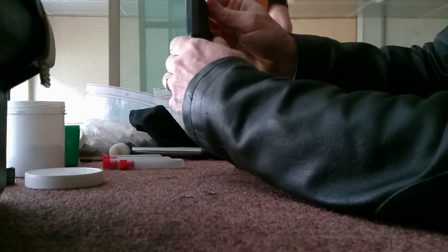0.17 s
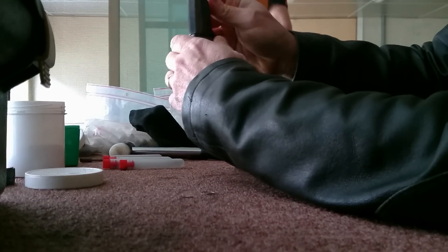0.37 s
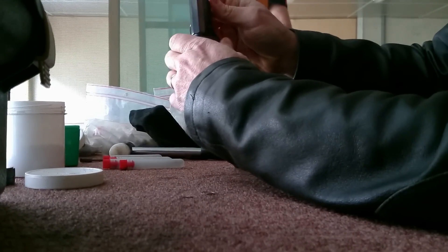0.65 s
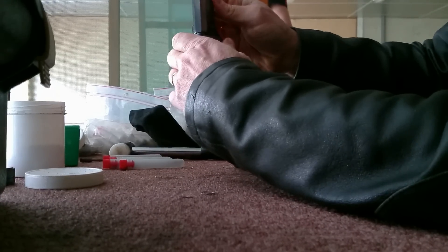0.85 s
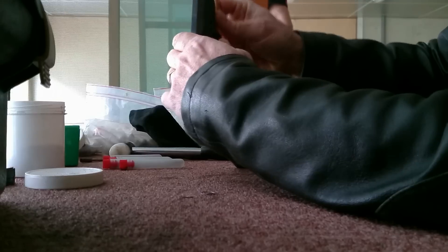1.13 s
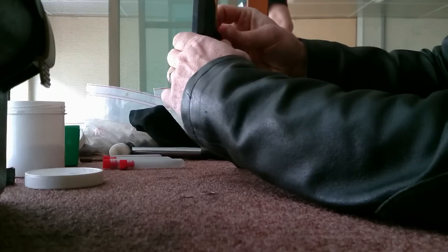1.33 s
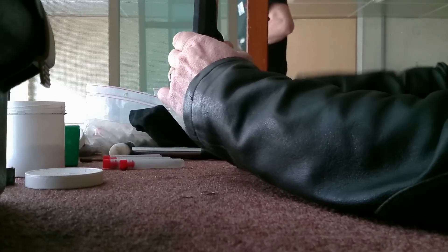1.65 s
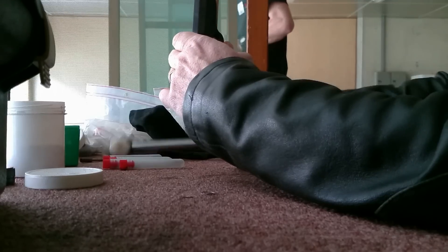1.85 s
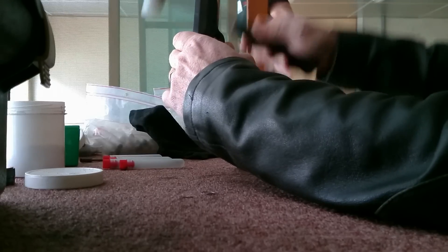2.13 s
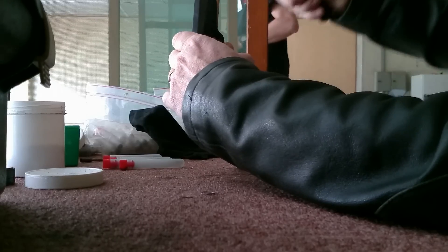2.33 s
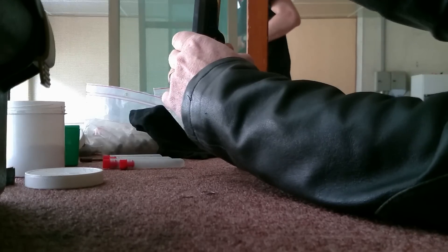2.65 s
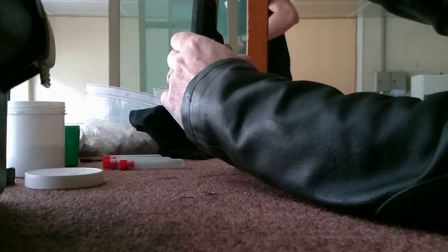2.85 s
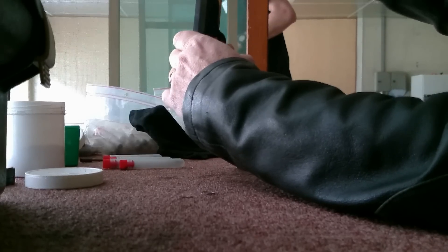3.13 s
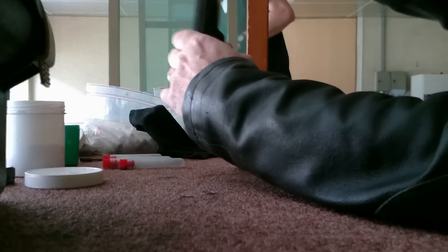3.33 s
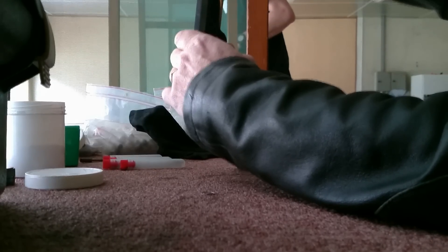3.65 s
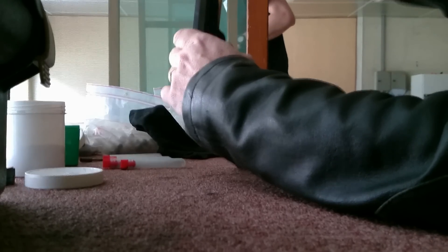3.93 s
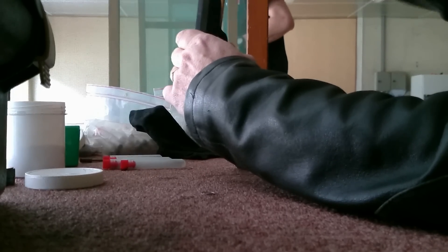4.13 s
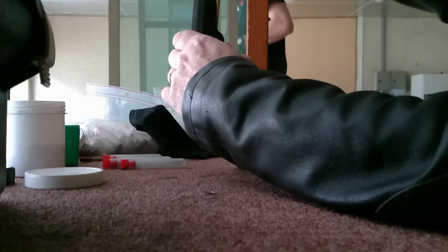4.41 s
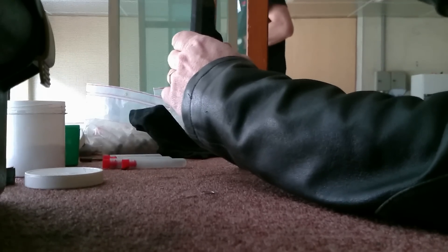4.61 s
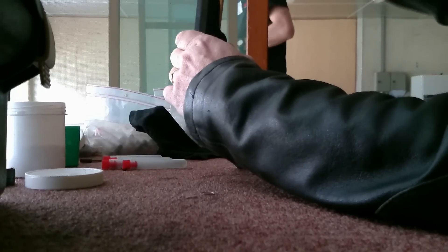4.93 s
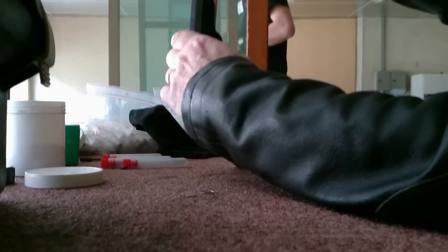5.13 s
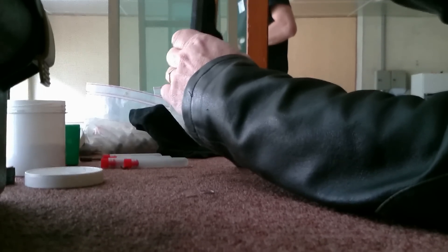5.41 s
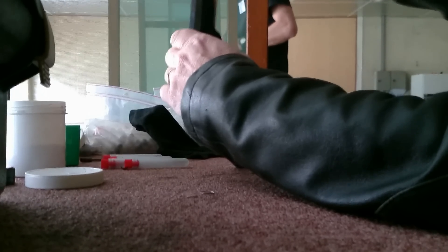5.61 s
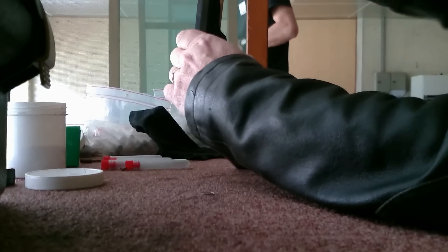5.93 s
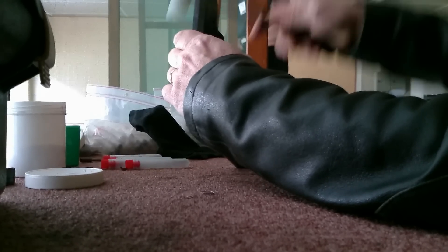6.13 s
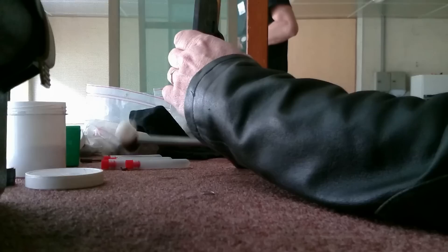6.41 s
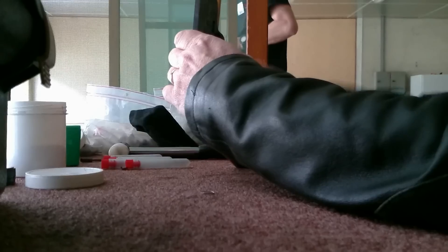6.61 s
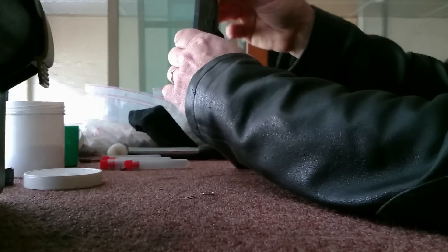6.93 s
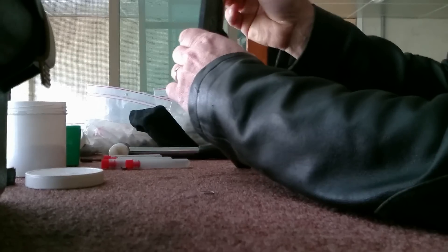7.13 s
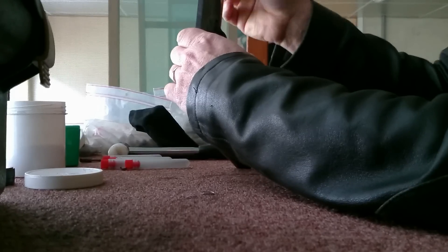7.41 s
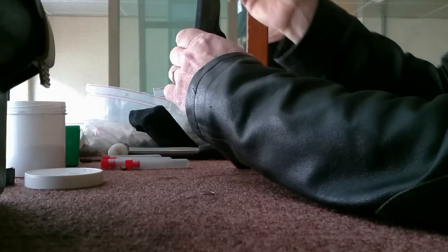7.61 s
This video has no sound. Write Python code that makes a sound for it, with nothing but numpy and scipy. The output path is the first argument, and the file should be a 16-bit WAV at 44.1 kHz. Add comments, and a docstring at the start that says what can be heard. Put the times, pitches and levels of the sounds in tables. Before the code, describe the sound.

Quiet room noise with soft knocks and a bright cluster of metallic clicks as a revolver is handled. Then come about four blows a second, growing quickly from moderate to violent, steel cracking and the table booming beneath, overloaded, with small rattles and short room echo. They stop abruptly; a rod is put down with a low bouncing thud, and only slight sleeve rustles and tiny ticks remain.

```python
"""A steel rod is rammed down thirteen times on an old revolver on a cloth-covered table in a bare room.
Noise bursts make the steel crack, and pushed modes make the table boom and overload a small stereo recorder.
Before and between the blows, resonant noise bursts click like small metal parts under the fingers.
The rod scrapes and is laid down with a bouncing thump of one low mode. Grainy noise rustles as a leather
sleeve, over steady room noise."""
import sys
import numpy as np
from scipy import signal
from scipy.io import wavfile

SR = 44100
rng = np.random.default_rng(int(sys.argv[2]) if len(sys.argv) > 2 else 0)


def master_out(mix):
    """Clip the mix to full scale and print it as 16-bit PCM to the path in sys.argv[1]."""
    frames = np.transpose(np.atleast_2d(mix))
    ceiling = np.clip(frames, -1, 1)
    pcm = np.round(ceiling * 32767).astype(np.int16)
    wavfile.write(sys.argv[1], SR, pcm)


N = 342216

# Rod blows: t/s, boom level/dB, crack level/dB, contact/ms, clack f/Hz, clack level/dB
ROD_BLOWS = [(2.7094, -16, -8, 3, 2670, -28.5), (2.9441, -9, -6.5, 4.9, 2210, -21),
             (3.194, -6, -4.5, 4.9, 2230, -19), (3.491, -2.5, 1, 3.9, 2530, -14),
             (3.778, 0.5, 5, 1.6, 2770, -22), (4.0577, 1.5, 4.5, 2.76, 1790, -22),
             (4.353, 1, 7, 0.32, 2680, -11), (4.645, -0.7, -3.5, 5.8, 3250, -16),
             (4.933, -2.14, -2, 4.7, 3330, -15.5), (5.1961, 1.5, -1.5, 3.9, 1940, -21),
             (5.445, 0, 3, 2.46, 2520, -13), (5.7437, 0, 3, 2.75, 2830, -17.5),
             (6.0113, 1.5, 9, 0.68, 1760, -8)]
# Loose things that jump and land after a blow: delay/ms, level/dB
RATTLES = [(8.7, -23), (18.2, -30)]
# Table top modes: f/Hz, level/dB, t60/s, left minus right/dB, gain per dB of force/dB
TABLE_MODES = [(97.7, 2.5, 0.18, -2, 0.07), (116.2, -13, 0.27, 4.5, -0.26), (141.8, -0.66, 0.16, 5.5, 0.27),
               (172.8, -15, 0.32, 2.5, 0.47), (186.6, -21, 0.44, 4, -0.34), (229.5, -14.5, 0.22, 4, -0.48),
               (256.5, -30, 0.35, 3.5, -.9), (295, -12.5, 0.17, 1, -0.4), (340.3, -4, 0.12, 3.5, 0.48),
               (385, -15, 0.22, -2, -0.6), (443, -15, 0.036, 11, 2), (520, -11, 0.028, 5, 1.15),
               (646.6, -15, 0.14, 8, -0.34), (792, -16.5, 0.17, 1.5, 0.3), (707, -8.5, 0.041, 0.5, -1),
               (875, -0.5, 0.024, 2, 0.5)]
# Soft knocks on the table: t/s, boom level/dB, thud level/dB, share reaching the lowest modes/dB
SOFT_KNOCKS = [(0.367, -54.5, -60.5, 13), (0.495, -45, -77, -5), (0.582, -33, -83, -15),
               (0.62, -31.5, -58.5, -12.5), (1.231, -56, -52, -4), (1.51, -39, -62, -5),
               (1.834, -38, -59, -1), (6.671, -11, -47.5, -2.5), (6.696, -29, -64, 14),
               (6.723, -17.5, -58, -3), (6.768, -28, -63, -5), (6.973, -33, -66, -15),
               (7.175, -42, -57, 1.5), (7.424, -23, -61.5, -36)]
# Dense upper modes of the table, decay: f/Hz, t60/s
THUD_DECAY = [(100, 0.59), (400, 0.15), (1100, 0.077), (3000, 0.024)]
# Dense upper modes of the table, colour: f/Hz, level/dB
THUD_SPECTRUM = [(60, -33), (150, -10), (400, -2.5), (750, -5), (1300, -18.5), (2500, -14.5), (6000, -53.5)]
# Close modes of the steel rod: f/Hz, level/dB, t60/s
ROD_MODES = [(3190, -4, .45), (3268, 0, .5), (3320, -2, .45), (3375, -2, .35)]
# Blows that leave the rod ringing: t/s, level/dB
RINGING_BLOWS = [(4.355, -45), (4.647, -37), (4.934, -35), (5.198, -37)]
# The rod lands and bounces on the cloth: t/s, level/dB
ROD_LANDINGS = [(6.674, -7.5), (6.725, -15), (6.768, -22)]
# Resonances of the sliding rod and table: f/Hz, width/Hz, level/dB
SCRAPE_RESONANCES = [(403, 200, 1.5), (880, 370, -7.5), (2800, 990, -12), (5787, 500, -17),
                     (8300, 1600, -16)]
# Metal clicks: t/s, peak level/dB, left minus right/dB, f/Hz, t60/ms, room send/dB, duller body/dB
METAL_CLICKS = [(0.408, -30.5, -8, 8750, 25, -16, -17.5), (0.4208, -36, 2, 5760, 34, -19, -14),
                (0.4317, -47, 20, 7300, 14, -14.5, -8), (1.164, -42, -3, 7500, 6, -11.5, -30),
                (1.1733, -17.5, -1, 5640, 23, -12, -26.5), (1.2208, -10, -7, 5770, 11, -13.5, -27),
                (1.2242, -12, 5, 6130, 11, -5, -22), (1.2305, -19.5, -10.5, 5850, 12, -3, -23.5),
                (1.2405, -11, 4, 8720, 71, -2, -16.5), (1.2393, -4, -19.5, 5586, 17, -5.5, -13),
                (1.3745, -14.5, -1.5, 5270, 9.4, -9, -37.5), (1.51, -41.5, 9, 7390, 20.5, -22, -8),
                (1.611, -30.5, 0, 6400, 12, -6, -14.5), (1.807, -21.5, 2.5, 6040, 44, 10, -11),
                (1.809, -25, -15, 1234, 78, 13.5, -1), (2.025, -39, 10, 4970, 12.5, 6, -9),
                (2.0815, -41.5, -4, 10000, 13.4, -5, -16), (2.83, -31.5, 10.5, 7700, 5.2, -18, -15),
                (3.266, -26, 17, 7900, 13, -25, -31), (3.526, -16.5, 15, 7800, 10, 2, -15),
                (4.713, -24, 10, 13800, 26, -20.5, -3), (4.7263, -30, 41.5, 8500, 13, -14, -14.5),
                (5.4875, -19, 27, 7800, 8.4, 6, -13.5), (5.662, -34, -4.5, 7550, 56, 6.5, -16),
                (5.768, -10, 9, 9100, 6, -13.5, -14.5), (6.6726, -35.5, 9.5, 1830, 16, 1, -14.5),
                (6.482, -54, 1, 4520, 12.8, -12.5, -20.5), (6.89, -54, 2, 903, 12.4, -9, -14),
                (7.188, -37.5, 22, 5080, 31, -2, -21.5), (7.197, -38.5, 6.5, 5700, 12, -10, -14),
                (7.549, -54, 5, 8640, 10, -10, -20), (7.5214, -54, 8, 2800, 12.6, -9, -17),
                (7.5834, -54, 6, 8340, 12.5, -7, -13), (7.6275, -54.5, -5, 2880, 14.8, -9, -16),
                (7.6933, -52, -13, 2910, 15, -2, -10)]
# Steel frame modes: f/Hz, level/dB, t60/s
FRAME_MODES = [(2440, -29, 0.08), (2880, -28, .12), (4860, -26, 0.17), (5700, -28, 0.1), (6050, -25, 0.22),
               (8150, -25, .09)]
# Movements of sleeve and fingers: peak t/s, rustle level/dB, dull rub level/dB, dying time/s
MOVEMENTS = [(.07, -57, -65.5, 0.16), (0.436, -57, -59, 0.063), (1.03, -64, -85, 0.04),
             (1.157, -75, -49.5, 0.023), (1.224, -31.5, -79, 0.054), (2.087, -53.5, -79.5, 0.015),
             (6.399, -62, -67.5, 0.071), (6.649, -64, -52, 0.049), (7.03, -75, -74, 0.034),
             (7.188, -54, -58, 0.025), (7.44, -79, -70.5, 0.042), (7.539, -70, -68.5, 0.026),
             (7.69, -64.5, -87, 0.06)]
# Decay of the room: f/Hz, t60/s
ROOM_DECAY = [(300, 0.94), (1100, 0.33), (2900, 0.42), (7700, 0.38), (14000, 0.31)]
# Colour of the room's echoes: f/Hz, level/dB
ROOM_SPECTRUM = [(300, 2), (900, 1.5), (1600, -1), (2900, 1.5), (7700, -2.5), (11500, -7.5), (14000, -23),
                 (16500, -20.5)]
# Relative noise density of the quiet room: f/Hz, level/dB
NOISE_SPECTRUM = [(15, -33), (25, -2.5), (62, -5), (214, -23), (927, -32.5), (1060, -33), (1180, -38.5),
                  (3810, -36.5), (11300, -45.5), (14800, -50), (16500, -62)]
# Microphone port resonances, left list then right list: f/Hz, width/Hz, level/dB
PORT_RESONANCES = [
    [(8100, 2400, 8.5), (5700, 2900, -10), (13200, 1800, -6)],
    [(5385, 990, 10.5), (2900, 570, 3), (7550, 4500, -16.5)],
]

# Crack: the steel contact builds, holds, then dies; the grind is hollow between clack and treble
GRIP_MS, LET_GO_MS = 1, 1
HOLLOW_HZ, HOLLOW_WIDTH_HZ, HOLLOW_SHARE = 3960, 2500, 0.47
CRACK_LAG = 20  # samples by which the right port hears it later
# Clack: rough, its pitch blurred; it dies after the contact
CLACK_WIDTH_HZ, CLACK_T60_MS = 650, 12
# Shiver: six more bright ticks per blow, at random from 20 ms on within this span, fading
SHIVER_S, SHIVER_DB, SHIVER_LOSS_DB_PER_S = 0.099, -13.5, 106.5
# What a blow of 0 dB boom sends to the room; dB gained per dB of boom
ECHO_DB, ECHO_FOLLOWS = -8, 1

# Push on the table at 0 dB boom: harder is shorter, and it follows the contact
BLOW_PUSH_MS, PUSH_MS_PER_DB, BOOM_DELAY_S = 2.146, 0.15, 0.0011
# A sharp, shorter tap starts together with every push and reaches the upper modes; it gains with force
TAP_MS, TAP_DB, TAP_FOLLOWS = 0.76, -4.5, 0.96
# A soft knock pushes longer and shares the blend of modes of a blow this soft
KNOCK_PUSH_MS, KNOCK_BLEND_DB = 4.3, -7.5
TABLE_LATE_MS = 0.3  # the right port hears the modes later
# Thud of a blow of 0 dB boom; dB gained per dB of boom; samples the right port hears it later
THUD_DB, THUD_FOLLOWS, THUD_LAG = -14, 1.85, 9

DROP_HZ, DROP_T60_S = 140, 0.078  # a short dead thump
SCRAPE_S, SCRAPE_DB = (6.595, 6.672), -51  # the rod slides on the table before it drops

# Clicks: little below a share of the pitch; widths of two resonances in a row as shares of it
CLICK_FLOOR_SHARE, CLICK_WIDTH_1, CLICK_WIDTH_2 = 0.72, 0.22, 0.7
FAR_DB_PER_OCTAVE = 18  # a click stirs frame modes far from its own pitch less
# A finger drags along the frame, ever lighter, and damps its modes to this width
RUB_S, RUB_DB, RUB_WIDTH_HZ = (7.166, 7.25), -63, 140

RISE_SHARE = 0.45  # a rustle swells in this share of its dying time
REST_DB, REST_RUB_DB = -79, -70.5  # faint rustle and rub between movements
LEATHER_HZ, LEATHER_WIDTH_HZ, LEATHER_DB = 5710, 750, -11.5  # narrow hissing band
ROOM_NOISE_DB = -56  # rms over both channels
# Zero-line wander: at rest; after a 0 dB boom; dB per dB of boom; dying time
WANDER_REST_DB, WANDER_DB, WANDER_FOLLOWS, WANDER_S = -41.5, -28, 0.38, 0.36
CUTOFF_HZ = 17100


def rod_blows():
    """Grinding steel contact with rattles and ticks, its pitched clack, and the impulses sent to the room."""
    crack, clacks, sent = np.zeros(N), np.zeros(N), np.zeros(N)
    t = np.arange(1400) / SR
    build = np.minimum(1000 * t / GRIP_MS, 1)
    for s, boom_db, crack_db, ms, clack_hz, clack_db in ROD_BLOWS:
        past_contact_ms = np.maximum(1000 * t - ms, 0)
        for late_ms, db in [(0, 0.008)] + RATTLES:
            noise = butter(rng.standard_normal(len(t)), [1300, 13500], "band")
            grind = noise * build * np.exp(-past_contact_ms / LET_GO_MS)
            hollow = grind - HOLLOW_SHARE * resonance(grind, HOLLOW_HZ, HOLLOW_WIDTH_HZ)
            add(crack, s + late_ms / 1000, hollow * from_db(crack_db + db))

        # The resonance runs in for 600 samples before it is heard.
        rough = resonance(rng.standard_normal(len(t) + 600), clack_hz, CLACK_WIDTH_HZ)[600:]
        pitched = rms_one(resonance(rough, clack_hz, 2 * CLACK_WIDTH_HZ))
        clack = pitched * build * from_db(-60 * past_contact_ms / CLACK_T60_MS)
        add(clacks, s, clack * from_db(clack_db))

        for late_s, chance in rng.random((6, 2)) * [SHIVER_S, 1] + [0.02, 0]:
            tick = butter(rng.standard_normal(len(t)), [3500, 11000], "band") * np.exp(-t / 0.0016)
            tick_db = crack_db + SHIVER_DB - SHIVER_LOSS_DB_PER_S * late_s - 8 * chance
            add(crack, s + late_s, tick * from_db(tick_db))
        add(sent, s, from_db([ECHO_DB + ECHO_FOLLOWS * boom_db]))
    return crack, clacks, sent


def table_pushes():
    """Blows and knocks as t/s, level/dB, thud/dB, push/ms, lowest modes/dB, blend/dB; harder blows push shorter."""
    pushes = []
    for s, db, *_ in ROD_BLOWS:
        push_ms = BLOW_PUSH_MS - PUSH_MS_PER_DB * db
        pushes.append((s + BOOM_DELAY_S, db, THUD_DB + THUD_FOLLOWS * db, push_ms, 0, db))
    for s, db, thud_db, bass_db in SOFT_KNOCKS:
        pushes.append((s + BOOM_DELAY_S, db, thud_db, KNOCK_PUSH_MS, bass_db, KNOCK_BLEND_DB))
    return pushes


def table(pushes, spread_db=2.5):
    """Half-sine pushes ring the table's separate modes; its dense upper modes blur into a thud."""
    boom, struck = np.zeros((2, N)), np.zeros(N)
    luck = rng.standard_normal((len(pushes), len(TABLE_MODES)))
    for k, (hz, level_db, t60, pan_db, follows) in enumerate(TABLE_MODES):
        force, lowest = np.zeros(N), k < 3
        for (s, db, _, ms, bass_db, blend_db), chance in zip(pushes, luck[:, k]):
            gain = from_db(db + level_db + follows * blend_db + lowest * bass_db + spread_db * chance)
            add(force, s, half_sine(ms) * gain)
            if not lowest:
                add(force, s, half_sine(TAP_MS) * gain * from_db(TAP_DB + TAP_FOLLOWS * db))
        sign = 1 if lowest else (-1) ** k  # lowest three in step, the others in turns
        late = round(TABLE_LATE_MS * SR / 1000)
        boom += spread(sign * ring(force, hz, t60), pan_db / 2, -pan_db / 2, late)
    for s, _, thud_db, *_ in pushes:
        add(struck, s, from_db([thud_db]))
    thud = dying(struck, THUD_SPECTRUM, THUD_DECAY, alike=0.87, swell_s=0.00047, patchy_db=2.5)
    return boom + spread(thud, 45.1, 41.65, THUD_LAG)


def rod_ring():
    """The rod rings in a cluster of close modes that beat against each other."""
    struck = np.zeros(N)
    for s, ring_db in RINGING_BLOWS:
        add(struck, s, from_db([ring_db]))
    return sum(smeared(from_db(db) * ring(struck, hz, t60), 60) for hz, db, t60 in ROD_MODES)


def drop():
    """The cloth deadens the table under the falling rod: one low mode, soon gone."""
    force = np.zeros(N)
    for s, db in ROD_LANDINGS:
        add(force, s, half_sine(KNOCK_PUSH_MS) * from_db(db))
    return ring(force, DROP_HZ, DROP_T60_S)


def scrape():
    """Sliding roughness excites resonances of rod and table, growing until the drop."""
    t, (start, stop) = np.arange(N) / SR, SCRAPE_S
    uneven = rms_one(butter(rng.standard_normal(N), 150, "low"))
    rough = rng.standard_normal(N) * from_db(2.5 * uneven)
    colour = sum(from_db(db) * rms_one(twice_resonant(rough, hz, width, width))
                 for hz, width, db in SCRAPE_RESONANCES)
    swell = np.interp(t, [start, start + 0.018, stop, stop + 0.017], [0.022, 0.55, 1.0, 0])
    return from_db(SCRAPE_DB) * colour * swell


def click_colour(x, hz, body_db):
    """Two broad resonances give a click its pitch, over a duller body."""
    bright = butter(x, CLICK_FLOOR_SHARE * hz, "high")
    pitched = twice_resonant(bright, hz, CLICK_WIDTH_1 * hz, CLICK_WIDTH_2 * hz)
    return pitched + from_db(body_db) * butter(x, [650, 2400], "band")


def clicks():
    """Dying noise excites each metal part's resonance; an impulse of the same colour goes to the room."""
    dry, sent, t = np.zeros((2, N)), np.zeros(N), np.arange(2600) / SR
    for s, db, pan_db, hz, ms, room_db, body_db in METAL_CLICKS:
        noise = rng.standard_normal(len(t)) * from_db(-60000 * t / ms)
        tick = click_colour(noise, hz, body_db)
        blip = click_colour(1.0 * (t == 0), hz, body_db)
        sides = from_db(db + 0.5 * pan_db * np.array([[1], [-1]]))
        add(dry, s, tick / np.abs(tick).max() * sides)
        add(sent, s, blip * from_db(db + room_db))
    return dry, sent


def frame():
    """Clicks and a drag stir the steel frame's modes; clicks between first and last blow leave it silent."""
    out = np.zeros(N)
    luck = rng.standard_normal((len(METAL_CLICKS), len(FRAME_MODES)))
    dragging = np.interp(np.arange(N) / SR, RUB_S, [1, 0], left=0)
    for k, (hz, level_db, t60) in enumerate(FRAME_MODES):
        struck, drag = np.zeros(N), dragging * rng.standard_normal(N)
        for (s, db, _, pitch_hz, *_), chance in zip(METAL_CLICKS, luck[:, k]):
            amid_blows = ROD_BLOWS[0][0] < s < ROD_BLOWS[-1][0]
            if not amid_blows:
                far_db = FAR_DB_PER_OCTAVE * abs(np.log2(hz / pitch_hz))
                add(struck, s, from_db([db + level_db - far_db + 3 * chance]))
        out += smeared(ring(struck, hz, t60), 130)
        rub = twice_resonant(drag, hz, RUB_WIDTH_HZ, RUB_WIDTH_HZ)
        out += from_db(RUB_DB) * np.sqrt(SR / RUB_WIDTH_HZ) * rub  # narrow bands keep their loudness
    return out


def rustle(rough_db=3.05):
    """Dense uneven grains of leather and cloth over a duller rub; each movement swells and dies."""
    t = np.arange(N) / SR
    high_gain, low_gain = from_db(REST_DB), from_db(REST_RUB_DB)
    for s, high_db, low_db, dying_s in MOVEMENTS:
        shape = np.exp(-np.abs(t - s) / dying_s / np.where(t < s, RISE_SHARE, 1))
        high_gain = high_gain + from_db(high_db) * shape
        low_gain = low_gain + from_db(low_db) * shape
    uneven = rms_one(butter(rng.standard_normal(N), 120, "low"))
    grains = rng.standard_normal((2, N)) * from_db(rough_db * uneven)
    high = rms_one(butter(grains, [2200, 11000], "band"))
    low = rms_one(butter(grains, [200, 1300], "band"))
    hiss = rms_one(twice_resonant(high, LEATHER_HZ, LEATHER_WIDTH_HZ, LEATHER_WIDTH_HZ))
    return high_gain * (high + from_db(LEATHER_DB) * hiss) + low_gain * low


def room_noise():
    """Steady broad noise; the bass is largely alike in both channels."""
    out = 0
    for hz, pair in bands(N):
        out = out + from_db(at_hz(NOISE_SPECTRUM, hz)) * partly_alike(pair, np.clip(400.0 / hz, 0, 0.9))
    return from_db(ROOM_NOISE_DB) * rms_one(out)


def wander():
    """Infrasonic wavering near 7 Hz, far stronger in the right channel; each blow stirs it up."""
    noise, stirred = rng.standard_normal(N + SR), np.zeros(N)
    for s, boom_db, *_ in ROD_BLOWS:
        add(stirred, s, from_db([WANDER_DB + WANDER_FOLLOWS * boom_db]))
    excited = signal.lfilter([1], [1, -np.exp(-1 / (WANDER_S * SR))], stirred)
    rocking = resonance(resonance(noise, 7.2, 1.8), 12.0, 19.0)[SR:]
    return rms_one(rocking) * (from_db(WANDER_REST_DB) + excited) * from_db([[-25.5], [0]])


def dying(impulses, colour, t60s, alike, swell_s, patchy_db):
    """Countless modes or echoes: the energy put into each band swells, dies away and sounds as noise."""
    out, rise = 0, np.exp(-1 / (swell_s * SR))
    for hz, pair in bands(N):
        fall = from_db(-120 / (at_hz(t60s, hz) * SR))  # energy falls twice as fast as amplitude
        power = butter(impulses + 1e-9, hz * 2 ** np.array([-0.25, 0.25]), "band") ** 2
        energy = signal.lfilter([1 - rise], np.convolve([1, -fall], [1, -rise]), power)
        patches = rms_one(butter(rng.standard_normal(N), 11.0, "low"))  # each band dips on its own
        gain = from_db(at_hz(colour, hz) + patchy_db * patches)
        out = out + gain * np.sqrt(energy) * partly_alike(pair, alike)
    return out


def smeared(x, hz):
    """Slow noise makes a ring swell and waver at random."""
    return x * (0.45 + 0.9 * rms_one(butter(rng.standard_normal(N), hz, "low")))


def half_sine(ms):
    """A push of unit area."""
    push = np.sin(np.linspace(0, np.pi, round(ms * SR / 1000)))
    return push / push.sum()


def ring(impulses, hz, t60):
    """A unit impulse sets a sine of height 1 ringing."""
    r, w = from_db(-60 / (t60 * SR)), 2 * np.pi * hz / SR
    return signal.lfilter([0, np.sin(w)], [1, -2 * r * np.cos(w), r * r], impulses + 1e-18)


def resonance(x, hz, width_hz):
    """Band-pass with gain 1 on top."""
    r = np.exp(-np.pi * width_hz / SR)
    b = np.array([1, 0, -1]) * (1 - r * r) / 2
    return signal.lfilter(b, [1, -2 * r * np.cos(2 * np.pi * hz / SR), r * r], x)


def twice_resonant(x, hz, width_1_hz, width_2_hz):
    """Two resonances in a row at one pitch."""
    return resonance(resonance(x, hz, width_1_hz), hz, width_2_hz)


def butter(x, hz, kind):
    """Butterworth filter of design order two."""
    return signal.sosfilt(signal.butter(2, hz, kind, fs=SR, output="sos"), x)


def bands(size):
    """Half-octave bands of noise, own in each channel, with their centres."""
    edges, white = 25 * 2 ** np.arange(0, 9.6, 0.5), rng.standard_normal((2, 2, size))
    # Neighbouring bands take turns with two noises.
    return [(np.sqrt(a * b), butter(white[k % 2], [a, b], "band"))
            for k, (a, b) in enumerate(zip(edges, edges[1:]))]


def partly_alike(pair, alike):
    """Mix a share of the left noise into the right at equal power."""
    left, right = pair
    return np.array([left, alike * left + np.sqrt(1 - alike ** 2) * right])


def spread(x, left_db, right_db, lag):
    """Levels for the two ports, the right one late by lag samples."""
    x = x * from_db([[left_db], [right_db]])
    x[1] = np.concatenate([np.zeros(lag), x[1, :-lag]])
    return x


def add(track, s, sound):
    """Mix a short sound in at time s."""
    i = round(s * SR)
    track[..., i:i + sound.shape[-1]] += sound[..., :N - i]


def from_db(db):
    """Decibels to gain."""
    return 10 ** (np.asarray(db, float) / 20)


def rms_one(x):
    """Scale to unit rms."""
    return x / np.sqrt(np.mean(x ** 2) + 1e-20)


def at_hz(points, hz):
    """Read a spectrum on a log frequency axis."""
    f, values = np.array(points).T
    return np.interp(np.log(hz), np.log(f), values)


def scene():
    """Everything at the two microphone ports."""
    crack, clack, crack_sent = rod_blows()
    boom = table(table_pushes())
    ticks, ticks_sent = clicks()
    blows = spread(crack, -1.8, -9.0, CRACK_LAG) + clack + boom + rod_ring()
    room = dying(crack_sent + ticks_sent, ROOM_SPECTRUM, ROOM_DECAY, alike=0.46, swell_s=0.0006, patchy_db=1.8)
    return blows + drop() + scrape() + ticks + frame() + rustle() + room + room_noise()


def record(dry):
    """Ports resonate, bass rolls off, loud booms saturate, the zero line wanders and the top is cut."""
    x = np.array([c + sum((from_db(db) - 1) * resonance(c, hz, width_hz) for hz, width_hz, db in port)
                  for c, port in zip(dry, PORT_RESONANCES)])
    x = butter(x, 100.0, "high")
    top = 0.78  # ceiling of the overload
    x = x / (1 + np.abs(x / top) ** 4) ** 0.25
    x = signal.lfilter(*signal.butter(1, 22, "high", fs=SR), x) + wander()
    return signal.sosfilt(signal.cheby2(16, 80, CUTOFF_HZ, fs=SR, output="sos"), x)


dry = scene()
out = record(dry)
master_out(out)
```